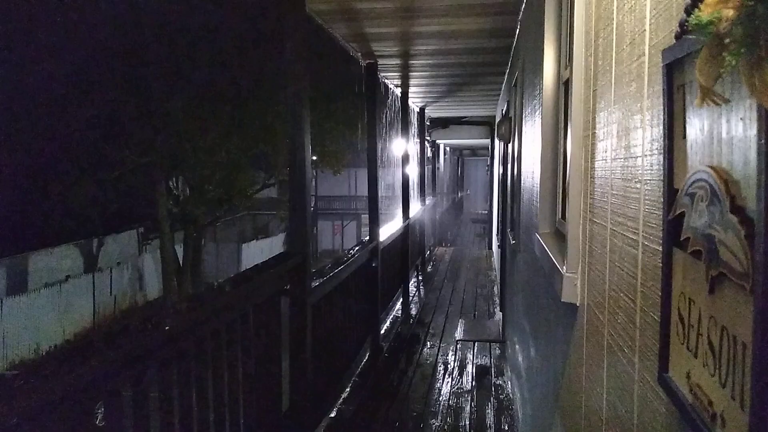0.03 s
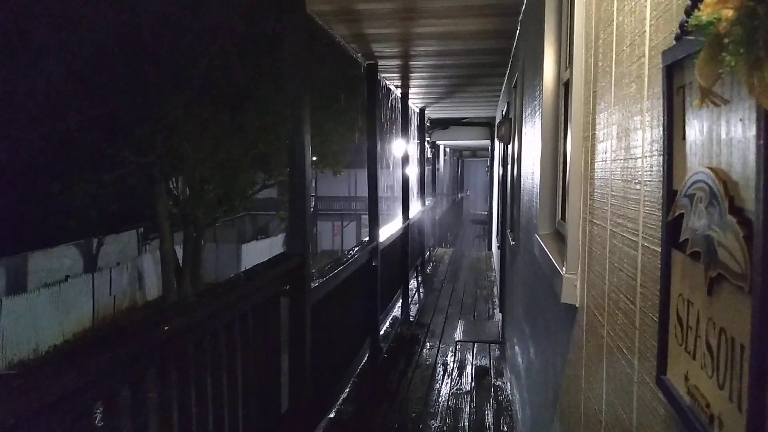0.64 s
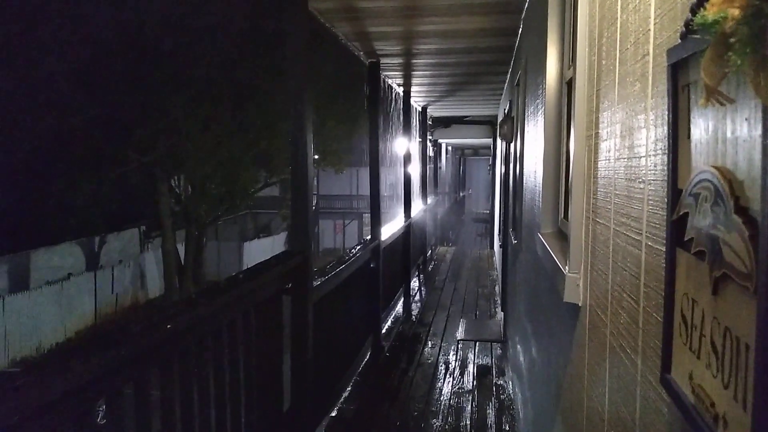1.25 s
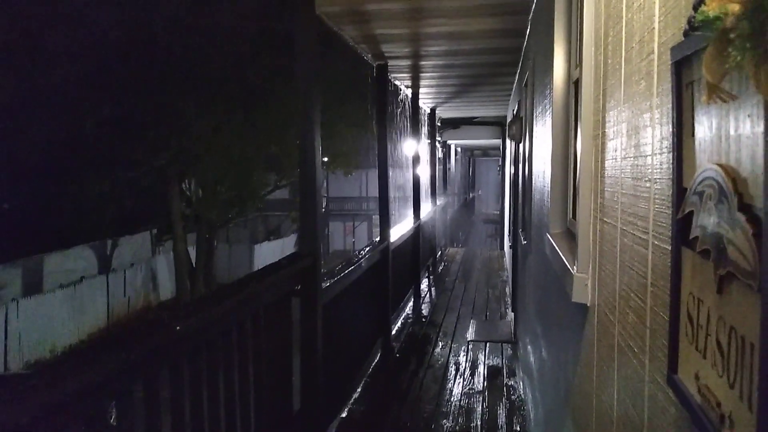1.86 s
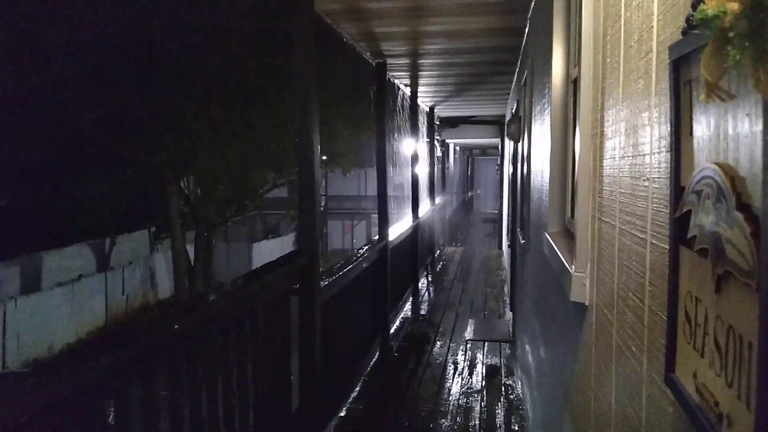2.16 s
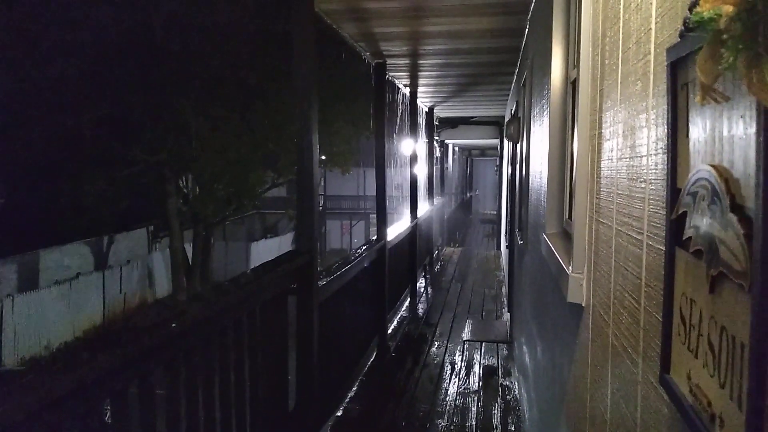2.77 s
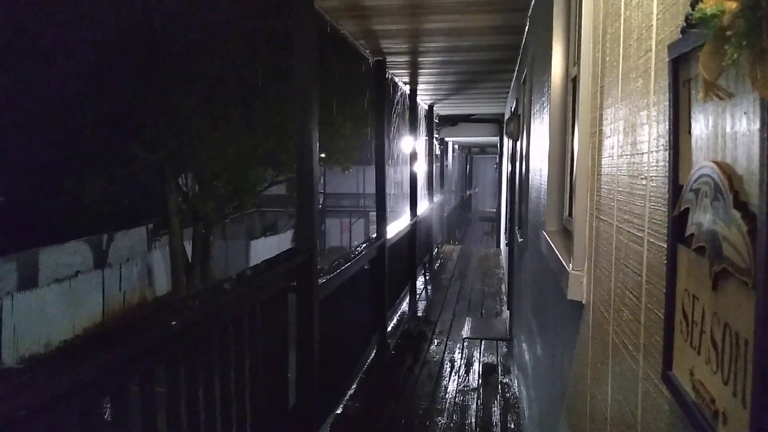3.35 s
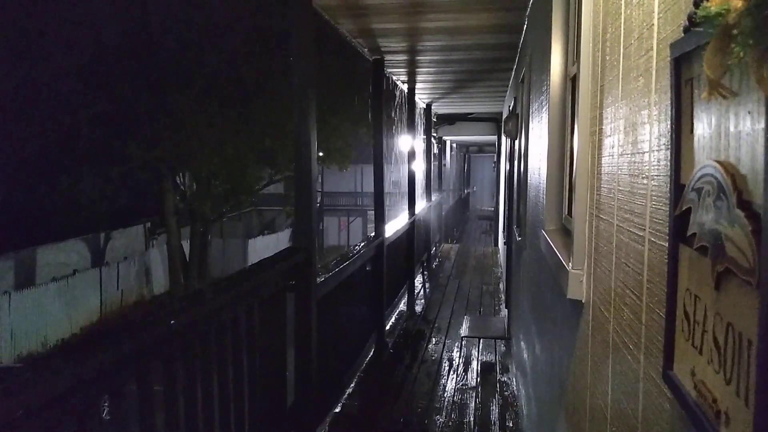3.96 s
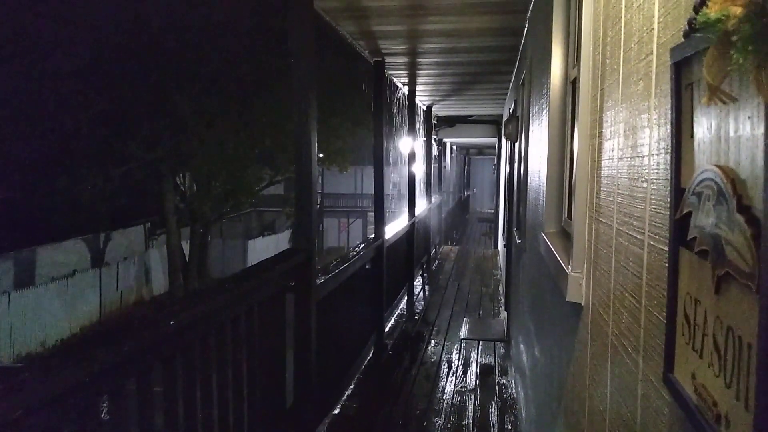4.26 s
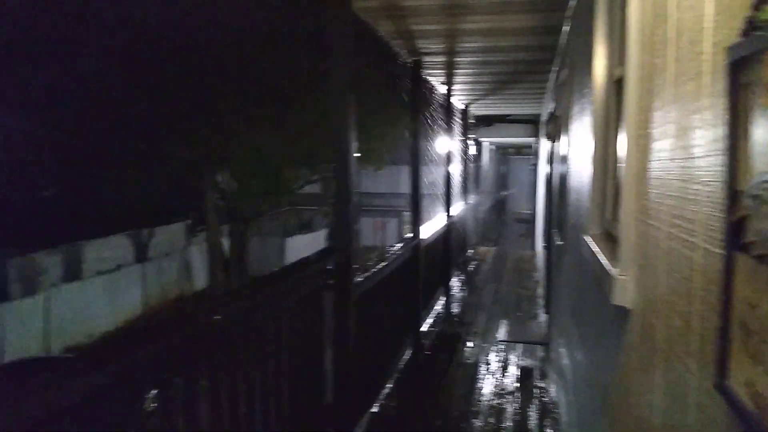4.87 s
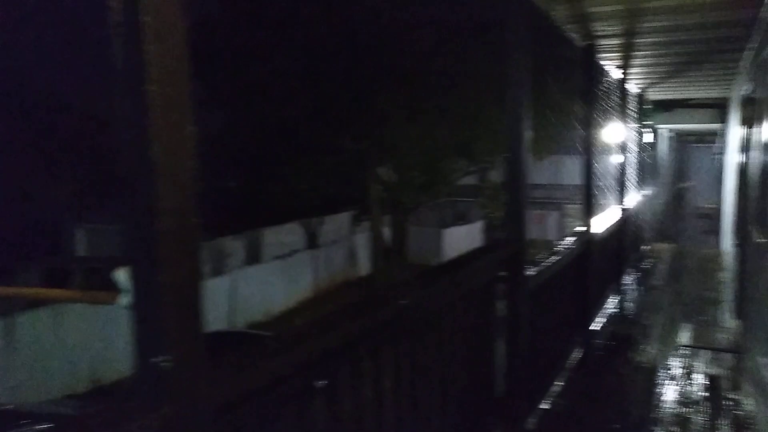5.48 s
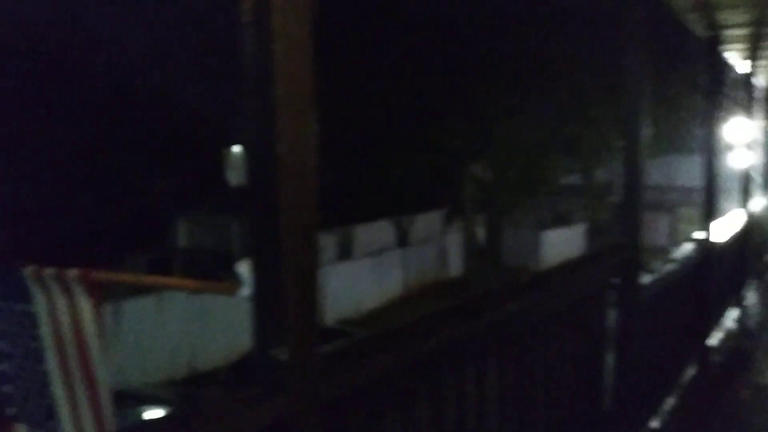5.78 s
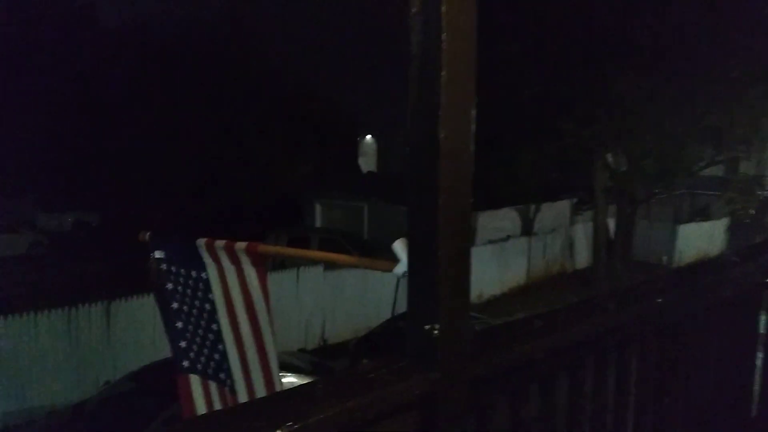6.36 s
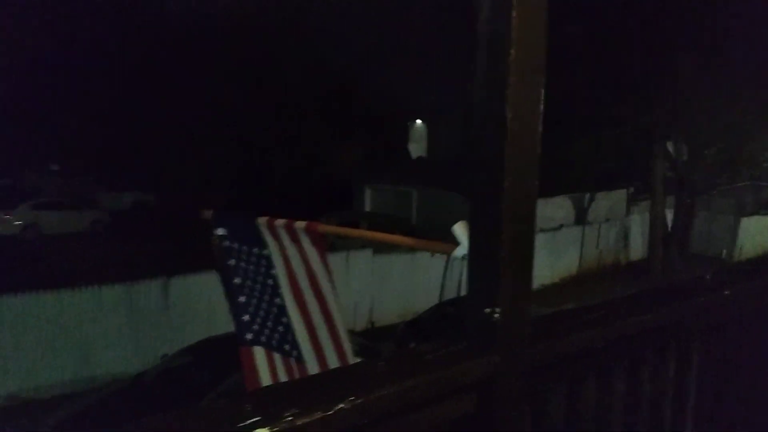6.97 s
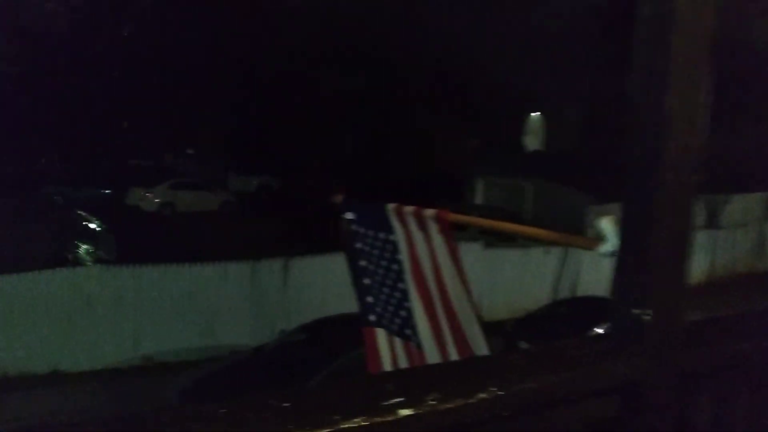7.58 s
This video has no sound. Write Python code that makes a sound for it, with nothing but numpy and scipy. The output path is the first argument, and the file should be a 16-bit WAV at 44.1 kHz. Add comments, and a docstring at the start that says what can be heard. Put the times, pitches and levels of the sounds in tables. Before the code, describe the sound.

Rain fades in loud, then settles to an even hiss, with sharp ticks and small splashes of drips around a porch.

```python
"""Steady night rain, heard from a covered wooden porch; the sound fades in loud, then drops back
and stays even. Countless impacts add into a hiss, brighter on the left, where the yard lies open.
Near drops tick, drips from the eaves splash in puddles or set the boards ringing, and bubbles resonate
in the runoff. A far engine drones at its firing rate and air nudges the microphone. Late on, the
microphone turns toward the yard, and a soft, distant pattering comes in."""
import sys
import numpy as np
from scipy import signal
from scipy.fft import rfft, irfft
from scipy.io import wavfile

SR = 44100
rng = np.random.default_rng(int(sys.argv[2]) if len(sys.argv) > 2 else 0)


def pcm_store(signal):
    """Save signal as 16-bit PCM."""
    levels = np.round(np.clip(np.atleast_2d(signal), -1, 1) * 32767)
    wavfile.write(sys.argv[1], SR, levels.astype(np.int16).T)


N = 336483

# Spectra of fine spray, pats on wood, the broad wash and a tick: frequency_hz, relative_gain_db
HISS_SPECTRUM = [(3000, -40), (4600, -17.5), (5300, -12.5), (6100, -8.5), (7100, -5), (7900, 0.5),
                 (9300, 0.5), (10300, -6.5), (11500, -10.5), (13300, -12), (14500, -16), (15500, -17)]
PAT_SPECTRUM = [(900, -19), (1600, -7), (2200, -1.5), (2800, -2.5), (3400, -0.5), (4000, -0.5),
                (4800, -2.5), (6500, -3), (12000, -27.5)]
WASH_SPECTRUM = [(25, -19), (50, -1), (80, -0.5), (130, 0), (260, 1), (450, -3), (750, 1), (1000, -2),
                 (1500, -3), (2300, -7), (5000, -16.5), (12000, -33)]
TICK_SPECTRUM = [(1500, -21.5), (4500, -19.5), (6800, -10), (8200, 7.5), (9500, 7), (11500, -6.5),
                 (15500, -11.5)]
# The open side is brighter: frequency_hz, left_minus_right_db
OPEN_SIDE_BALANCE = [(200, -15), (1300, -2), (2400, 4), (5000, 1), (6500, 6.5), (8500, 3.5), (11000, -5.5),
                     (15000, 14)]
# The rain thickens and thins a little, in hiss and pats alike: time_s, gain_db
RAIN_DRIFT = [(1.3, 0), (1.9, 0.6), (2.35, -0.4), (2.65, 0.9), (3.7, -0.5), (4.25, 0.4), (5.0, 0),
              (5.7, 0.6), (6.4, -0.5), (7.63, 0.5)]
# Strength of the tiny droplets close by: time_s, level_db
DROPLET_ENVELOPE = [(1.5, -65), (4.3, -59), (6.2, -66)]
# Course of the far engine: time_s, firing_rate_hz, level_db
ENGINE_COURSE = [(1.2, 76.9, -76), (2.6, 81, -76.5), (3.4, 79.2, -76.5), (4.4, 72.4, -75), (4.8, 73.3, -84),
                 (5.3, 86.5, -77), (5.9, 92, -76), (6.4, 90, -83), (7.6, 76, -90)]
# Drips into puddles: start_s, onset_level_db, centre_hz, t60_s, left_minus_right_db
PUDDLE_DRIPS = [(0.437, -35.5, 8400, 0.17, 1), (1.112, -28, 8300, 0.11, 1), (2.128, -49, 7500, 0.37, 3),
                (2.521, -46.5, 7800, 0.099, 9), (2.803, -49, 8850, 0.17, 3), (3.539, -44, 11000, 0.047, 1),
                (4.693, -45.5, 8800, 0.26, -5), (5.858, -47.5, 7260, 0.19, 0), (7.070, -45, 8600, 0.066, 2),
                (7.184, -39.5, 7230, 0.21, 1), (7.518, -46.5, 9300, 0.05, -2), (7.571, -47, 6140, 0.27, -1)]
# Near drops on the rail: start_s, dry_peak_db, extra_brightness_db, left_minus_right_db
RAIL_DROPS = [(0.4388, -16, 6, 2), (0.7395, -26.5, -6, 6), (0.9326, -11, 8, 2), (1.0405, -15, 7, -5),
              (1.1164, -12, -5, -7), (1.1226, -16, 12, 1), (1.15, -18, 1, 2), (1.6507, -28, 0, -4),
              (2.1277, -29, -10, 4), (2.9965, -28, 0, 12), (3.5432, -27.5, 1, 6), (3.9191, -25.5, -4, 5),
              (4.202, -29, 0, 2), (4.268, -27, 8, 7), (5.165, -29, 0, 9), (5.478, -30, -12, 6)]
# Drips on the boards: start_s, onset_level_db, centre_hz, width_octaves, left_minus_right_db
BOARD_DRIPS = [(0.828, -40.5, 3520, 0.35, 5), (1.405, -55.5, 3800, 0.33, 0), (1.733, -53, 3600, 0.63, 0),
               (1.866, -56, 3300, 0.36, 5), (2.132, -52, 3700, 1, 6), (2.498, -57, 3650, 0.33, 4),
               (2.771, -48, 3100, 0.36, 5), (2.804, -56, 3330, 0.26, 6), (3.115, -58.5, 3300, 0.36, 6),
               (3.356, -56.5, 3600, 0.3, 6), (4.126, -54.5, 3370, 0.6, 8), (4.174, -50.5, 3160, 0.48, 5),
               (4.606, -58.5, 3320, 0.4, 12), (4.821, -58.5, 3530, 0.35, 9), (4.975, -58.5, 3260, 0.24, 11),
               (5.093, -55.5, 3380, 0.44, 6), (5.237, -51.5, 3100, 0.35, 3), (5.859, -48.5, 3500, 0.56, -4),
               (7.067, -54.5, 2860, 0.5, -2), (7.184, -55.5, 3060, 0.49, 3), (7.569, -55.5, 2780, 0.69, -1)]
# The clearest gurgles of runoff: start_s, level_db, pitch_hz
RUNOFF_GURGLES = [(1.46, -71, 200), (2.045, -71, 698), (2.11, -71.5, 214), (3.58, -73.5, 467),
                  (3.635, -74, 642), (4.405, -71, 835), (6.09, -71.5, 300), (6.165, -71.5, 796),
                  (6.235, -73, 288)]
# Air nudging the microphone: peak_time_s, level_db, centre_hz, length_s
AIR_PUFFS = [(1.785, -59.5, 71.6, 0.067), (2.19, -67.5, 81, 0.12), (3.32, -66.5, 62, 0.145),
             (3.955, -60.5, 51.7, 0.19), (5.08, -62.5, 62.5, 0.09), (6.057, -65, 66.5, 0.045),
             (6.786, -65, 105, 0.13)]

START_S, RISE_S, FALL_S = 0.378, 0.3, 0.095  # the sound fades in loud, then drops back
WASH_LOUD_S, HISS_LOUD_S = 0.702, 0.755  # from START_S until the level falls; the hiss falls last
TURN_S, TURN_LENGTH_S = 5.2, 0.84  # the microphone turns from porch to yard


def undb(db):
    """Amplitude ratio for a level in decibels."""
    return 10 ** (np.asarray(db) / 20)


def unit(x):
    """Normalisation to an rms of 1."""
    return x / np.sqrt(np.mean(x ** 2))


def curve(rows, column=1):
    """Linear interpolation of one column of a time table at every sample."""
    rows = np.array(rows)
    return np.interp(np.arange(N) / SR, rows[:, 0], rows[:, column])


def ramp(start_s, length_s):
    """Linear rise from 0 to 1."""
    return np.clip((np.arange(N) / SR - start_s) / length_s, 0, 1)


def walk(rate_hz):
    """Slow random modulation with a spread near 1."""
    knots = rng.standard_normal(2048)
    return np.interp(np.arange(N) / SR * rate_hz, np.arange(len(knots)), knots)


def colour(x, spectrum, size=8192):
    """Minimum-phase filter: it imposes a spectrum while clicks keep their sharp front."""
    hz, db = np.transpose(spectrum)
    gain_db = np.interp(np.log(np.fft.rfftfreq(size, 1 / SR) + 1), np.log(hz), db)
    cepstrum = irfft(np.log(undb(gain_db)))
    cepstrum[1:size // 2] *= 2
    cepstrum[size // 2 + 1:] = 0
    response = irfft(np.exp(rfft(cepstrum)))[:size // 2]
    filtered = signal.oaconvolve(np.atleast_2d(x), response[None], axes=1)
    return filtered[:, :x.shape[-1]].reshape(x.shape)


def band(x, hz, octaves):
    """Band-pass filter centred on hz."""
    edges = np.clip(hz * 2 ** (np.array([-.5, .5]) * octaves), 10, SR / 2 - 100)
    return signal.sosfilt(signal.butter(2, edges, "band", fs=SR, output="sos"), x)


def sides(pan_db):
    """Direction as a level difference: gains with the left pan_db above the right."""
    return undb(np.array([[pan_db], [-pan_db]]) / 2)


def add(out, start_s, x):
    """Superposition of a short sound on the mix."""
    i = max(int(start_s * SR), 0)
    out[:, i:i + x.shape[1]] += x[:, :N - i]


def onset_level(x, db):
    """A burst scaled to this rms level over its first 10 ms."""
    return x * undb(db) / np.sqrt(np.mean(x[:, :SR // 100] ** 2))


def scattered(per_s, db, spread_db):
    """One random event per time slot: start_s, level_db, a chance value from 0 to 1."""
    late, size, chance = rng.random((int(per_s * N / SR), 3)).T
    return zip((np.arange(len(late)) + late) / per_s, db + spread_db * (2 * size - 1), chance)


def turned():
    """Crossfade: 0 while the microphone faces along the porch, 1 once it faces the yard."""
    return ramp(TURN_S, TURN_LENGTH_S)


def opening_level(steady_db, boost_db, loud_s):
    """Gain envelope: the sound fades in loud, then drops back to its steady level."""
    fallen = ramp(START_S + loud_s, FALL_S)
    return ramp(START_S, RISE_S) * undb(steady_db + boost_db * (1 - fallen))


def drops(per_s, spread_db, cap_db):
    """Shot noise of mostly small impacts; direction sets each one's delay and level between channels."""
    out = np.zeros((2, N))
    when, size, side, sign = rng.random((int(per_s * N / SR), 4)).T
    size_db = np.minimum(-spread_db * np.log(1 - size), cap_db)
    push = undb(size_db) * np.sign(sign - .5)
    arrival = (when * N).astype(int)
    lag = np.round(40 * (side - .5)).astype(int)
    np.add.at(out[0], arrival, push * (.5 + side))
    np.add.at(out[1], (arrival + lag) % N, push * (1.5 - side))
    return unit(out)


def spatter(impacts, t60_s):
    """Each impact throws a burst of droplets, whose energy decays exponentially."""
    retained = undb(-120 / (t60_s * SR))
    energy = signal.lfilter([1], [1, -retained], impacts ** 2)
    return unit(np.sqrt(energy) * rng.standard_normal((2, N)))


def patter():
    """Incoherent sum of drops on leaves, rail and ground: a hiss of spray above duller pats on wood."""
    fine = drops(per_s=990, spread_db=2.5, cap_db=20.5)
    near = fine + undb(-2) * spatter(fine, t60_s=.025)
    far = rng.standard_normal((2, N)) * undb(1.55 * walk(25))
    hiss = unit(colour(near + undb(6) * far, HISS_SPECTRUM))
    hiss_db = -48.5 + curve(RAIN_DRIFT) - 0.8 * turned()
    hiss *= opening_level(hiss_db, boost_db=17.5, loud_s=HISS_LOUD_S)
    fat = drops(per_s=450, spread_db=1, cap_db=17)
    pats = spatter(fat, t60_s=.15) + undb(-10) * fat
    pats = unit(colour(pats, PAT_SPECTRUM))
    pats_db = -58.5 + curve(RAIN_DRIFT) - 0.7 * turned()
    pats *= opening_level(pats_db, boost_db=17, loud_s=WASH_LOUD_S)
    both = hiss + pats
    left = colour(both[0], [(hz, db / 2) for hz, db in OPEN_SIDE_BALANCE])
    right = colour(both[1], [(hz, -db / 2) for hz, db in OPEN_SIDE_BALANCE])
    return np.array([left, right])


def wash():
    """Diffuse field of rain on roof and yard: long waves reach both channels coherently."""
    mid, side = rfft(rng.standard_normal((2, N)))
    hz = np.fft.rfftfreq(N, 1 / SR)
    coherence = np.sinc(hz / 1150)
    mid, side = mid * np.sqrt(1 + coherence), side * np.sqrt(1 - coherence)
    spectrum = np.array([mid + side, mid - side])
    # running water burbles: every half octave comes and goes on its own
    half_octaves = 2 * np.log2(np.clip(hz / 100, 1, 22))
    burble = np.zeros((2, N))
    for k in range(10):
        weight = np.maximum(1 - np.abs(half_octaves - k), 0)
        burble += irfft(spectrum * weight, N) * undb(2 * walk(15))
    envelope = opening_level(steady_db=-63.5, boost_db=18, loud_s=WASH_LOUD_S)
    return unit(colour(burble, WASH_SPECTRUM)) * envelope


def droplets():
    """Brief contacts radiate high frequencies: tiny droplets off the rail prickle on the open side."""
    clicks = drops(per_s=90, spread_db=4, cap_db=10)
    clicks = clicks + undb(-1) * spatter(clicks, t60_s=.025)
    gain = undb(curve(DROPLET_ENVELOPE) - 3 * turned())
    return unit(band(clicks, hz=12100, octaves=0.93)) * gain * sides(7.8)


def engine():
    """Periodic firing makes harmonics; only the lowest two carry this far, fading in and out."""
    firing_hz = curve(ENGINE_COURSE) * (1 + 0.0264 * walk(14))
    phase = 2 * np.pi * np.cumsum(firing_hz) / SR
    fundamental = np.sin(phase) * undb(5.7 * walk(7.7))
    octave = np.sin(2 * phase) * undb(5 * walk(9))
    return unit(fundamental + octave) * undb(curve(ENGINE_COURSE, column=2))


def spray(t60_s, contact_db):
    """A drip bursts: one impulse at contact, then an exponentially dying shower of droplets."""
    t = np.arange(SR // 4) / SR
    shower = rng.standard_normal((2, len(t))) * undb(-60 * t / t60_s)
    shower[:, 0] = undb(contact_db)
    return shower


def splashes(rise_s=0.0033):
    """Drips into standing water throw a fizzing spray: band-limited noise that builds, then decays."""
    out = np.zeros((2, N))
    for start_s, db, hz, t60_s, pan_db in PUDDLE_DRIPS:
        fizz = band(spray(t60_s, contact_db=0), hz, octaves=0.47)
        fizz *= 1 - np.exp(-np.arange(fizz.shape[1]) / SR / rise_s)
        add(out, start_s, onset_level(fizz, db) * sides(pan_db))
    return out


def ticks():
    """Impact and reflection: a near drop clicks and spatters, and the rail echoes it about 2 ms later."""
    out = np.zeros((2, N))
    faint = [(start_s, db, -3, 14 * side)
             for start_s, db, side in scattered(per_s=3, db=-36.5, spread_db=7)]
    for start_s, db, bright_db, pan_db in RAIL_DROPS + faint:
        click = spray(t60_s=.02, contact_db=28)
        echo_lags = rng.integers(70, 120, 2)
        click[[0, 1], echo_lags] += click[:, 0] * undb(-10)
        # each tick has its own brightness above 11 kHz
        click = colour(click, [(hz, gain_db + bright_db * (hz > 11000)) for hz, gain_db in TICK_SPECTRUM])
        add(out, start_s, click / np.abs(click).max() * undb(db) * unit(sides(pan_db)))
    return porch(out, wet_db=-2, t60_s=.12)


def porch(x, wet_db, t60_s):
    """Reverberation: wall, roof and floor scatter a short tail behind each impact."""
    t = np.arange(SR // 4) / SR
    tail = rng.standard_normal((2, len(t))) * undb(-60 * t / t60_s)
    tail *= undb(wet_db) / np.sqrt(np.sum(tail ** 2) / 2)
    return x + signal.fftconvolve(x, tail, axes=1)[:, :N]


def slaps(board_hz=3280, board_octaves=0.42, rebound_s=0.04, rebound_db=-7):
    """Damped resonance: fat drips and their rebounds excite the short, hollow ring of wet boards."""
    out = np.zeros((2, N))
    faint = [(start_s, db, board_hz * 2 ** (.3 * (spot - .5)), board_octaves, 10)
             for start_s, db, spot in scattered(per_s=2.5, db=-62, spread_db=-1) if start_s < TURN_S]
    for start_s, db, hz, octaves, pan_db in BOARD_DRIPS + faint:
        blow = spray(t60_s=.17, contact_db=19)
        rebound_lags = (rng.random(size=3) * rebound_s * SR).astype(int)
        blow[:, rebound_lags] += blow[:, :1] * undb(rebound_db)
        ring = band(blow, hz, octaves) + undb(-6) * band(blow, hz, 2 * octaves)
        add(out, start_s, onset_level(ring, db) * sides(pan_db))
    return out


def gurgles(low_hz=202.4, high_hz=898, rise_s=.003, decay_s=.013):
    """Bubble resonance in pooling water: six bubbles a gurgle, each ringing briefly as its pitch rises."""
    out, t = np.zeros((2, N)), np.arange(SR // 6) / SR
    faint = [(start_s, db, low_hz * (high_hz / low_hz) ** height)
             for start_s, db, height in scattered(per_s=3, db=-78, spread_db=2)]
    for start_s, db, hz in RUNOFF_GURGLES + faint:
        bubbles = np.zeros(len(t))
        for delay, detune, phase_cycles in rng.random((6, 3)):
            age = np.maximum(t - .05 * delay, 0)
            onset_hz = hz * 2 ** (.5 * (detune - .5))
            swing = np.sin(2 * np.pi * (onset_hz * age * (1 + 1.64 * age) + phase_cycles))
            bubbles += swing * (1 - np.exp(-age / rise_s)) * np.exp(-age / decay_s)
        add(out, start_s, unit(bubbles) * undb(db) * sides(5.9 * rng.standard_normal()))
    return out


def buffets():
    """Pressure fluctuations of air moving over the microphone make soft, low swells."""
    t, out = np.arange(N) / SR, np.zeros(N)
    for peak_s, db, hz, length_s in AIR_PUFFS:
        envelope = np.exp(-2 * ((t - peak_s) / length_s) ** 2)
        puff = band(rng.standard_normal(N), hz, octaves=0.67) * envelope
        out += puff * undb(db) * np.sqrt(np.sum(envelope ** 2) / np.sum(puff ** 2))
    return out * sides(-4.5)


def yard():
    """Shot noise of distant drops on grass and fence, heard as the microphone turns outward."""
    pats = spatter(drops(per_s=150, spread_db=10, cap_db=8), t60_s=0.14)
    return unit(band(pats, hz=1680, octaves=1)) * undb(-67.5) * turned()


def scene():
    """Superposition of all sources, silent until START_S."""
    rain = patter() + wash() + yard() + droplets() + ticks() + slaps() + splashes() + gurgles()
    return (rain + buffets() + engine()) * (np.arange(N) / SR > START_S)


def record(dry, low_hz=38, top_hz=15900):
    """Limited bandwidth: the phone cuts the deepest rumble and the highest treble."""
    dry = signal.sosfilt(signal.butter(4, low_hz, "high", fs=SR, output="sos"), dry)
    return signal.sosfilt(signal.ellip(10, .2, 70, top_hz, fs=SR, output="sos"), dry)


dry = scene()
out = record(dry)
pcm_store(out)
```